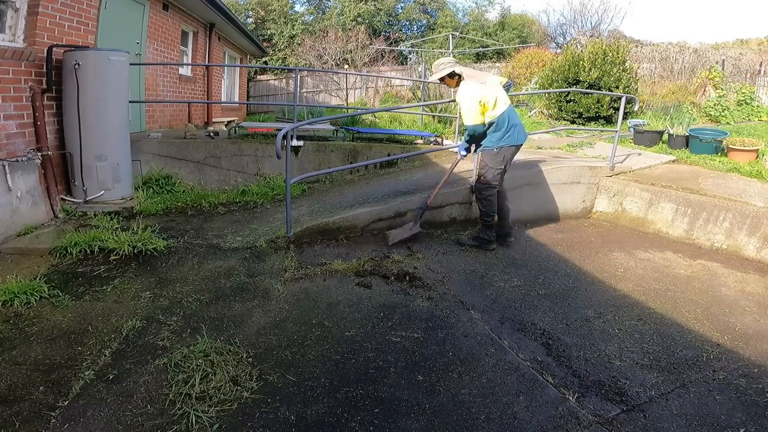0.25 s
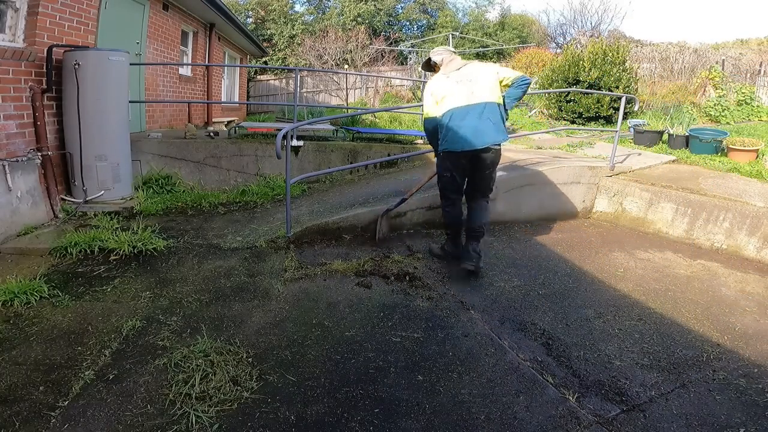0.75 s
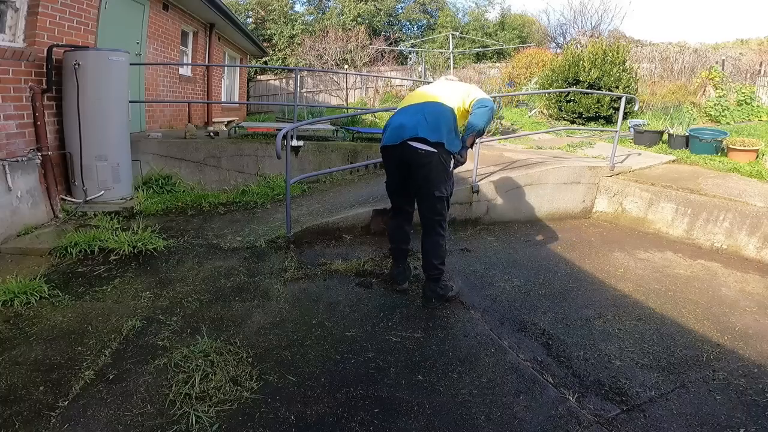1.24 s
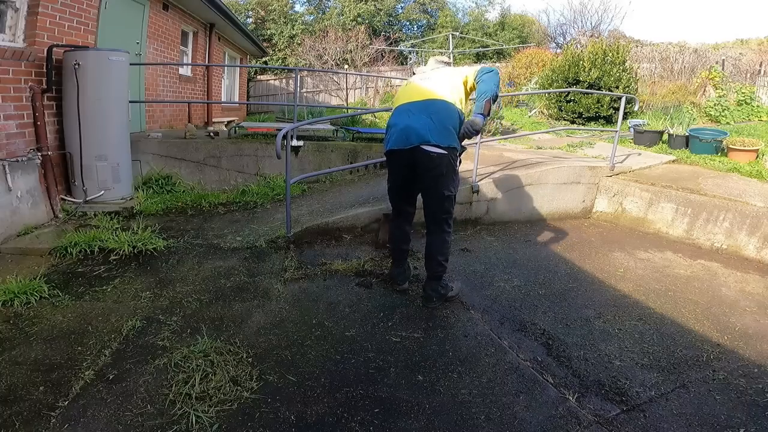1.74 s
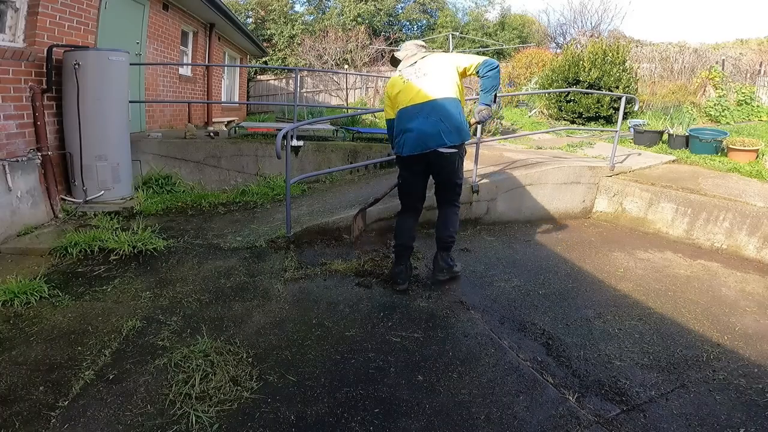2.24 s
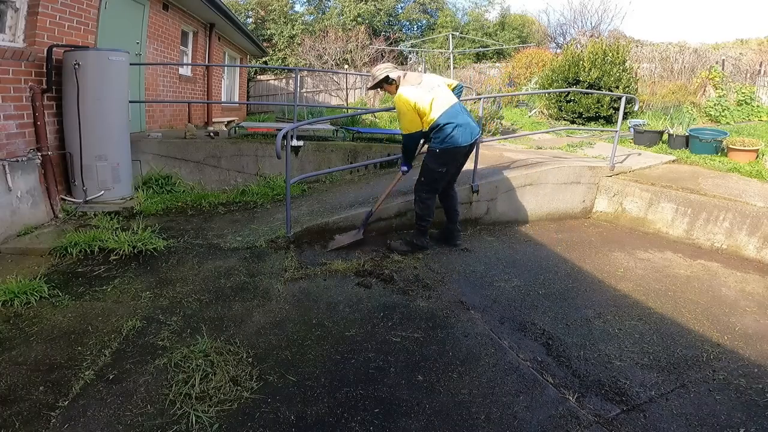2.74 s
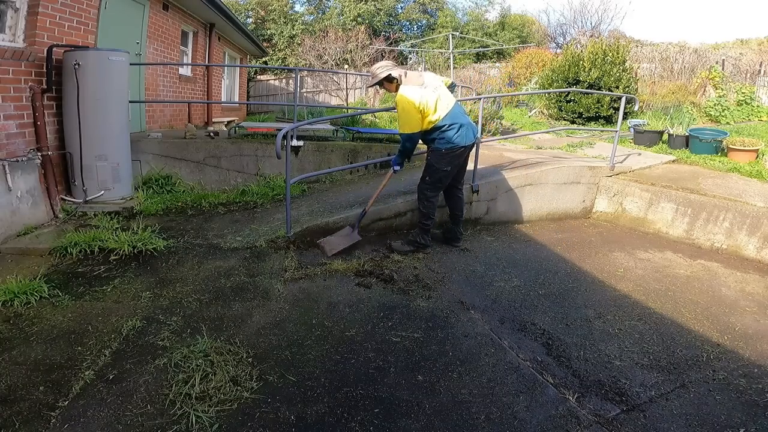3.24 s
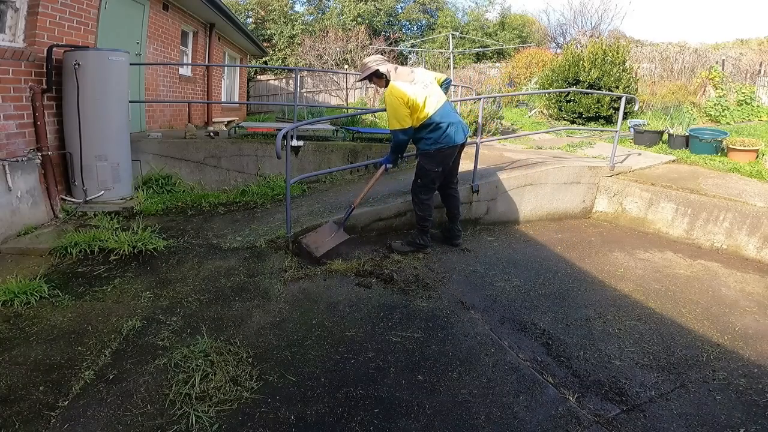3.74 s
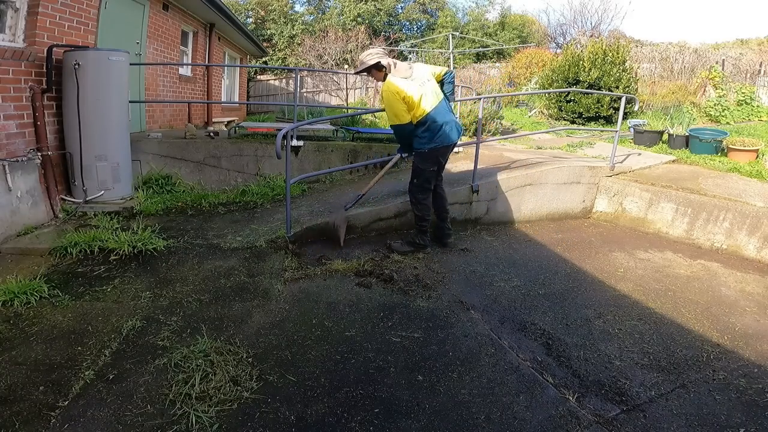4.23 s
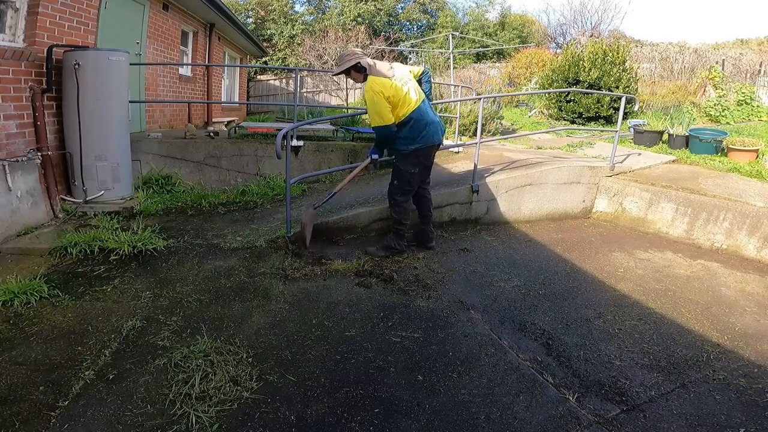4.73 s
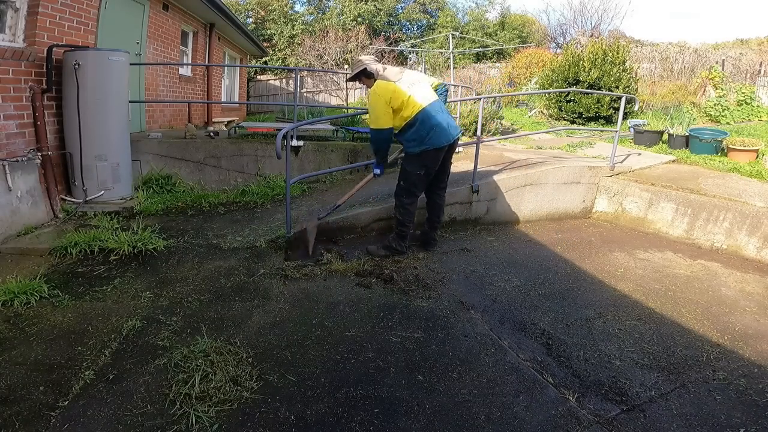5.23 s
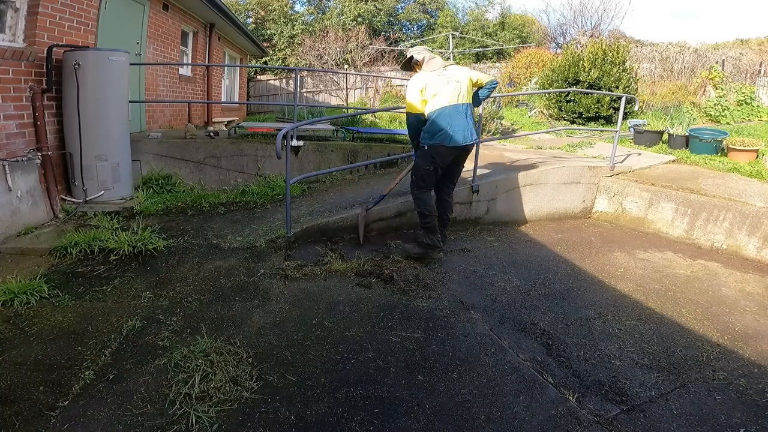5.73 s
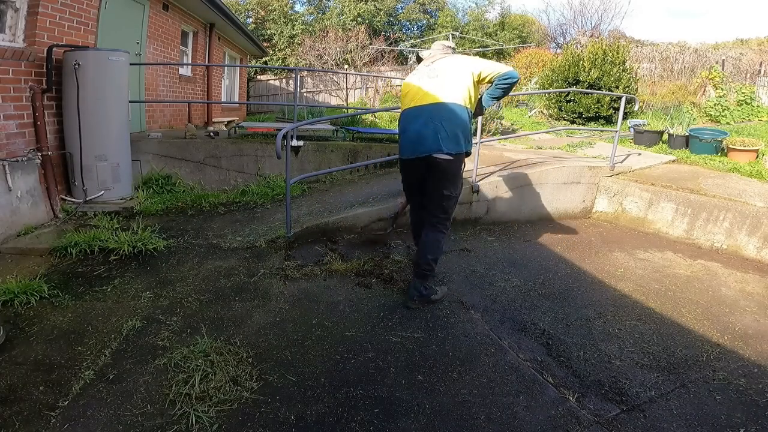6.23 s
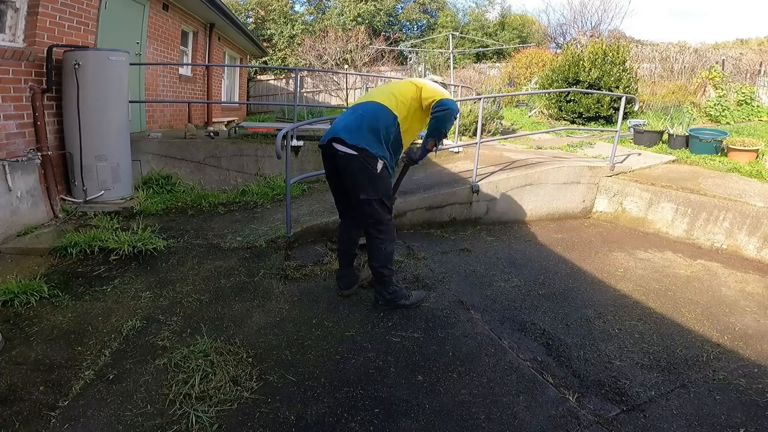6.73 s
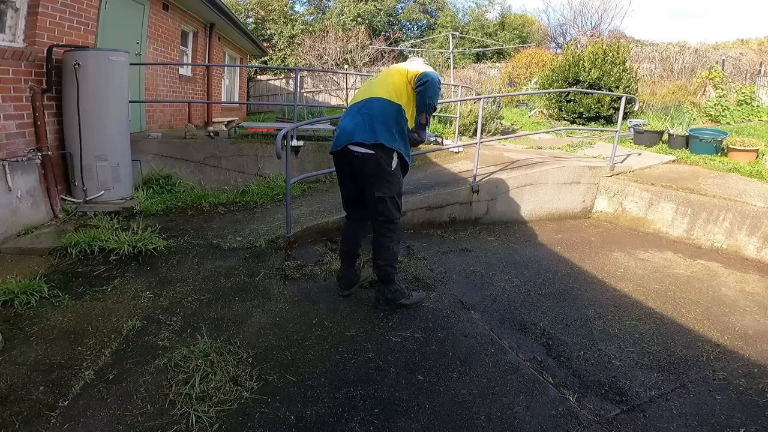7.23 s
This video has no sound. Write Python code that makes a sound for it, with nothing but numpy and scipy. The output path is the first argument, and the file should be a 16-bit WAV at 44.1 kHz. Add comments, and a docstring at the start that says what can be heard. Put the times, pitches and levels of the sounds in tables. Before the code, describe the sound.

In an open yard, a steel shovel is jabbed and pushed over mossy concrete a few metres from the microphone. Short gritty scrapes and crunchy knocks follow one another, some leaving a hollow glide or brief metallic ring, with dull damp thuds. Scraping turns brighter and denser mid-way, a distant engine drones later, wind rumble grows, strokes thin out and a faint bird whistles near the end.

```python
"""A light breeze moves from the start as a steel shovel is pushed and knocked, stroke after stroke, on mossy concrete.
Grit cracks under the edge and drives the blade's modes; wet moss deepens the sound and close surfaces scatter it.
Some contacts leave a hollow, gliding resonance or a singing steel tone; soft blows add low, ringless noise puffs.
Later a far engine drones in two fluttering orders, two faint scuffs pass and noise swells into a low wind rumble.
Near the end a bird whistles faintly: one buzzy sine that dips and rises."""
import sys
import numpy as np
from scipy import signal
from scipy.fft import rfft, irfft
from scipy.io import wavfile

SR = 44100
rng = np.random.default_rng(int(sys.argv[2]) if len(sys.argv) > 2 else 0)


def inscribe(sig):
    """Save sig as 16-bit PCM at rate SR to the path in sys.argv[1].

    A 1-D sig is mono; a 2-D sig holds one channel per row.
    Samples are clipped to [-1, 1] before scaling.
    """
    pcm = np.round(np.clip(np.atleast_2d(sig).T, -1, 1) * 32767)
    wavfile.write(sys.argv[1], SR, pcm.astype(np.int16))


N = 329427
TIME = np.arange(N) / SR
TAPS = 16384  # length in samples of the impulse responses

# Ringing modes of the steel blade.
# Each row: frequency in Hz, width in Hz, relative level over the broad rasp in dB.
BLADE = [(466, 14.7, -5), (759, 18, 0), (793, 10, 2.5), (995, 35, 6), (1245, 26, -0.5), (1408, 53, 2),
         (1587, 43, 8), (1795, 21, 2.5), (1951, 52, 9), (2113, 24, 3.5), (2226, 39, 8.5), (2400, 15, 4),
         (2640, 170, 1), (2860, 33, -1), (3144, 100, -2), (4100, 104, -3.5), (4620, 130, -1),
         (5170, 140, -9), (5190, 100, -6), (5620, 42, -20.5), (5820, 220, -3), (6480, 85, 2),
         (6880, 29, -3.5)]
# The far bird's whistle as a curve.
# Each row: time in seconds, centre pitch in Hz, relative level in dB.
BIRD = [(6.82, 5350, -77), (6.859, 4950, -61), (6.9, 4500, -57), (6.93, 4050, -57), (6.96, 4340, -61),
        (6.98, 4500, -72)]


def gain_of(db):
    """Decibels to amplitude."""
    return 10 ** (np.asarray(db) / 20)


def evened(x):
    """Scales each channel to rms 1."""
    return x / np.sqrt(np.mean(x ** 2, axis=-1, keepdims=True) + 1e-20)


def read(points, hz):
    """Reads a spectrum on a log-frequency axis."""
    f, value = np.transpose(points)
    return np.interp(np.log(hz + 1), np.log(f + 1), value)


def follow(rows, t):
    """The columns of a curve at times t."""
    s, *columns = np.transpose(rows)
    return [np.interp(t, s, column) for column in columns]


def add(mix, s, sound):
    """Mixes a stereo sound in at time s."""
    start = max(round(s * SR), 0)
    part = mix[:, start:][:, :sound.shape[1]]
    part += sound[:, :part.shape[1]]


def band(x, lo_hz, hi_hz, order=4):
    """Causal band-pass."""
    edges_hz = [lo_hz, min(hi_hz, SR / 2 - 100)]
    return signal.sosfilt(signal.butter(order, edges_hz, "band", fs=SR, output="sos"), x)


def wander(count, per_s):
    """A random curve through normal points of unit spread, per_s of them a second."""
    at = np.arange(count) * per_s / SR
    return np.interp(at, np.arange(count), rng.standard_normal(count))


def outdoors(low_db=4, gust_db=4):
    """Leaves and distant air, shaped from noise, swell slowly over a lumpy wind rumble."""
    # Colour of the open air. Each row: frequency in Hz, relative level in dB per Hz.
    air_colour = [(59, -11.5), (100, -11), (443, -22.5), (582, -16.5), (764, -32.5), (904, -21),
                  (1700, -26), (2130, -31), (2800, -32), (5040, -36.5), (15000, -61)]
    # Swell of the open air. Each row: time in seconds, level in dB before the flutter.
    breeze_swell = [(0, -64.5), (1.1, -63.5), (2.35, -72), (2.7, -59), (4.4, -53.5), (4.85, -54.5),
                    (5.6, -53), (6.8, -61), (7.2, -54.5)]
    # Swell of the low wind. Each row: time in seconds, relative level in dB.
    rumble_swell = [(0, -82.5), (2.4, -82.5), (3.9, -71), (4.4, -64), (6.9, -52), (7.4, -51)]

    hz = np.fft.rfftfreq(N, 1 / SR)
    noise_spectrum = rfft(rng.standard_normal((2, N)))
    air = evened(irfft(noise_spectrum * gain_of(read(air_colour, hz)), N))
    gusts = rng.standard_normal((2, N)) * gain_of(gust_db * wander(N, 8.2))
    rumble = evened(band(gusts, 24.2, 73.0, order=2))
    flutter_db = 1.8 * wander(N, 18)
    air_db = follow(breeze_swell, TIME)[0] + flutter_db
    rumble_db = follow(rumble_swell, TIME)[0] + low_db
    return air * gain_of(air_db) + rumble * gain_of(rumble_db)


def blade_response(contact_db=2.5, ripple_db=1.0):
    """Modes stand out of a broad rasp, differently for each point of contact; minimum phase lets them ring."""
    # Broad scrape colour of the steel. Each row: frequency in Hz, relative level in dB per Hz.
    rasp_colour = [(59, -9), (100, -8.5), (166, -7.5), (218, 2.5), (300, -2.5), (467, 3), (530, -1.5),
                   (774, 1), (1110, -8.5), (1550, -7), (1690, -6), (4660, -6.5), (7730, -11), (13700, -34),
                   (15500, -49)]

    hz = np.fft.rfftfreq(TAPS, 1 / SR)
    peaks = np.zeros(len(hz))
    for mode_hz, width_hz, db in BLADE:
        reach_db = contact_db * rng.standard_normal()  # how well this contact reaches the mode
        peaks += gain_of(db + reach_db) ** 2 / (1 + (2 * (hz - mode_hz) / width_hz) ** 2)
    # countless small upper modes
    crowded = np.interp(hz, np.linspace(0, SR / 2, 280), rng.standard_normal(280))
    crowded = crowded * np.minimum(hz / 4000, 1)
    rasp = gain_of(read(rasp_colour, hz) + ripple_db * crowded)
    log_gain = np.log(rasp * np.sqrt(.5 + peaks))
    # the Hilbert transform of the log gain around the full circle gives the minimum phase
    circle = np.concatenate([log_gain, log_gain[-2:0:-1]])
    return np.exp(np.conj(signal.hilbert(circle)))[:len(hz)]


def yard(early_s=0.0063, tail_db=-5, scatter_per_s=700):
    """Paths from one spot to left and right: direct, scatter from near surfaces, a short tail off the walls."""
    # How fast the walls let go of each pitch. Each row: frequency in Hz, time to fall 60 dB in seconds.
    tail_times = [(150, 0.2), (530, 0.14), (1400, 0.19), (3700, 0.14), (10000, 0.11)]

    t = np.arange(TAPS) / SR
    hits = rng.random((2, TAPS)) < scatter_per_s / SR
    early = rng.choice([-1, 1], (2, TAPS)) * hits * np.exp(-t / early_s)
    early[[0, 1], rng.integers(0, 60, 2)] += 1.2  # direct path
    diffuse = rng.standard_normal((2, TAPS)) * (1 - np.exp(-t / 0.002))
    hz, frame_s, frames = signal.stft(diffuse, SR, nperseg=256)
    decay = gain_of(-60 * frame_s / read(tail_times, hz)[:, None])
    tail = signal.istft(frames * decay, SR, nperseg=256)[1][:, :TAPS]
    return (evened(early) + gain_of(tail_db) * evened(tail)) / np.sqrt(TAPS)


def friction(count, grains_per_s, grain_db, smooth, judder_db):
    """Sand grains crack under the edge over a fine rub; the edge catches and slips."""
    sizes = gain_of(grain_db * np.minimum(rng.exponential(1, count), 4))
    signs = rng.choice([-1, 1], count)
    grains = evened(sizes * signs * (rng.random(count) < grains_per_s / SR))
    rub = smooth * rng.standard_normal(count)
    judder = gain_of(judder_db * wander(count, 215.5))
    return evened((grains + rub) * judder)


def ground_echo(x, share=0.34, delay_s=0.001609, drift=3):
    """The concrete mirrors the blade; the echo's delay drifts as it moves, so the colour sweeps."""
    at = np.arange(len(x))
    first_delay = delay_s * SR * rng.uniform(0.753, 1.282)  # in samples
    delay = first_delay * np.exp(drift * rng.uniform(-0.99, 1) * at / SR)
    echo = np.interp(at - delay, at, x, left=0)
    return (x + share * echo) / np.hypot(1, share)


def shovel(drive, force_db, load_db, grit_db, deep_db, deepening):
    """The drive sounds the blade; a load of moss adds body, and still more depth, while bare grit adds treble."""
    response = irfft(rfft(yard()) * blade_response())
    drive = ground_echo(drive)
    low_db = deep_db + deepening * load_db
    # Each row: lower edge in Hz, upper edge in Hz, level against the force in dB.
    registers = [(57.5, 183, low_db - 12.0), (163.5, 407, low_db), (466, 1435, load_db),
                 (1164, 3710, 0.0028), (3780, 38000, grit_db)]
    out = 0
    for lo_hz, hi_hz, db in registers:
        order = 2 if hi_hz < 200 else 4
        ring = evened(band(response, lo_hz, hi_hz, order)) / np.sqrt(TAPS)
        pressed = drive * gain_of(force_db + db)
        out = out + signal.fftconvolve(ring, pressed[None], axes=1)
    return out


def pushes(fade_s=0.0038, level_db=2, body_db=-1.0):
    """The edge is driven over the concrete, its force swelling and easing while moss piles up on the blade;
    two faint scuffs, perhaps footsteps, are made the same way."""
    # Each row: reference time in seconds, length in seconds, share of the length at which it bears hardest
    # (kept off the very ends), relative force in dB, relative load in dB (body against force),
    # grit in dB (treble against force). The rows at 5.588 and 6.254 are the scuffs.
    push_rows = [(0.0, 0.01, 0.067, -32, -6, -9.5), (0.081, .13, 0.78, -33.5, -8, -2.5),
                 (0.383, .11, 0.54, -35.5, -7, -4.5), (0.873, 0.083, 0.25, -53, 4, -2),
                 (1.422, 0.064, 0.84, -38, -5, -11), (1.457, 0.062, 0.4, -35.5, 0, -12),
                 (1.731, 0.093, 0.52, -47, 5.5, -7), (1.806, 0.041, 0.41, -35.5, -4.5, -8),
                 (2.128, 0.11, 0.4, -33.5, 0.5, -4.5), (2.767, 0.1, 0.37, -32.5, -11, 0.5),
                 (3.015, 0.084, 0.25, -34, -6.5, 2), (3.151, 0.054, 0.44, -34, -8.5, 0),
                 (3.208, 0.077, 0.41, -32, -5, 2), (3.402, 0.074, 0.32, -34.5, -11.5, -2),
                 (3.622, 0.095, 0.82, -36, -12, 0.5), (4.166, 0.13, 0.54, -31, -8, -2.5),
                 (4.587, 0.12, 0.54, -30, -12, -4), (4.947, 0.067, 0.15, -45, -8, -6),
                 (5.017, 0.059, .5, -48, 0.5, 1), (5.282, 0.11, 0.37, -33, -3, -2.5),
                 (5.588, .14, 1, -58, -2, -6.5), (5.939, 0.09, 0.22, -48.5, 0.5, 1.5),
                 (6.254, 0.13, 0.51, -64.5, -8, -6.5), (6.431, 0.085, .35, -38.5, -4, -4),
                 (6.538, 0.071, 0.91, -34.5, -2.5, 4), (6.607, 0.089, 0.11, -48, -11, 2.5),
                 (6.695, 0.079, 0.44, -44.5, -8, -3.5), (7.007, 0.048, 0.6, -33.5, -6.5, -4.5),
                 (7.15, .1, 0.23, -59.5, 3, -17), (7.266, 0.056, 0.92, -46, -2, -24),
                 (7.352, 0.067, 0.56, -47, 2, -9), (7.445, 0.063, 0.75, -31, -6, -2.5)]
    swell_db, ease_db = 13.5, 12  # rise up to the hardest point, fall after it
    pile_db = 2  # load gained from start to end

    out = np.zeros((2, N))
    t = np.arange(TAPS // 2) / SR
    for s, length_s, hardest, force_db, load_db, grit_db in push_rows:
        along = np.minimum(t / length_s, 1)
        hardest = np.clip(hardest, .05, .95)
        before_db = swell_db * (1 - along / hardest) ** 2
        after_db = ease_db * ((along - hardest) / (1 - hardest)) ** 2
        slack_db = np.where(along < hardest, before_db, after_db)
        moss_db = load_db + body_db + pile_db * (along - .5)
        press = np.clip(np.minimum(t, length_s - t) / fade_s, 0, 1)
        drive = press * friction(len(t), grains_per_s=2300, grain_db=5.0, smooth=0.91, judder_db=2.04)
        scrape = shovel(drive, force_db + level_db - slack_db, moss_db, grit_db, deep_db=-0.5, deepening=1.54)
        add(out, s - .004, scrape)
    return out


def knocks(rise_s=0.017, lead_s=.0152, level_db=-5, body_db=1.5):
    """The edge sinks through the moss and bites in a quick crunch that swells and dies."""
    # Each row: bite time in seconds, relative force in dB, relative load in dB (body against force),
    # grit in dB (treble against force), time constant of the dying contact in seconds.
    knock_rows = [(0.0747, -27.5, -3.5, -8.5, 0.0088), (0.367, -28, -2, -5, .02),
                  (0.5441, -30.5, -9.5, -9, 0.0084), (0.629, -31.5, 3.5, -8.5, 0.0091),
                  (0.706, -45.5, -7, -6, 0.034), (0.7508, -23, -9, -13.5, 0.0063),
                  (0.856, -29.5, -2, -12, 0.01), (0.9348, -36.5, 1, -9.5, 0.0053),
                  (0.9876, -39, -8.5, -21, 0.011), (1.2595, -19.5, -8.5, -5, 0.012),
                  (1.648, -23, -3, -5.5, 0.0088), (2.0477, -21.5, -2, -5.5, .01),
                  (2.4273, -62.5, 5.5, -4, 0.012), (2.4957, -63, -6, 5.5, 0.0031),
                  (2.693, -27, -5, -2, 0.024), (2.8835, -35.5, 1, 4, 0.0026), (2.9809, -33, -10, 1, 0.036),
                  (3.144, -31, -11, 5, 0.02), (3.3516, -28, -12.5, 0, 0.02), (3.4015, -30, -9, 6.5, 0.011),
                  (3.46, -29.5, -5, 2.5, .006), (3.5995, -28.5, -2.5, 3, 0.026),
                  (3.7114, -26, -1, -2, 0.003), (3.7932, -23, -6.5, -7, 0.004),
                  (3.9946, -28, -11, 4.5, .01), (4.144, -24.5, -1, -5.5, .008),
                  (4.4625, -45, 4, -7, 0.0033), (4.494, -49.5, -18, -15, 0.0083),
                  (4.5728, -22.5, -9.5, -3.5, 0.0086), (4.7194, -27.5, 0.5, -2, 0.0063),
                  (4.9184, -29, 5.5, 0, .012), (5.0745, -29.5, -7, 1, 0.0019),
                  (5.2476, -21.5, -2.5, -2, 0.01), (5.7346, -28.5, 1.5, -4.5, 0.024),
                  (5.836, -44, -12, 0, .008), (5.9, -43.5, -8, -4.5, .006), (6.3999, -23, -5, -10, .018),
                  (6.5994, -35, 4, 0, 0.0076), (6.8138, -48.5, 1, -2.5, .009),
                  (6.9038, -42, -11, -7, 0.0084), (6.9839, -28.5, 0, 3, 0.0075),
                  (7.3499, -30, -3, -10.5, .011)]

    out = np.zeros((2, N))
    t = np.arange(TAPS // 3) / SR
    for s, force_db, load_db, grit_db, contact_s in knock_rows:
        release = np.exp(-np.maximum(t - rise_s - .003, 0) / contact_s)
        press = np.minimum(t / rise_s, 1) ** 2 * release
        drive = press * friction(len(t), grains_per_s=4000, grain_db=3.5, smooth=0.97, judder_db=-1)
        crunch = shovel(drive, force_db + level_db, load_db + body_db, grit_db, deep_db=-4.0, deepening=1.83)
        add(out, s - lead_s, crunch)
    return out


def hollows(width_hz=210, level_db=3):
    """Scraping noise in the air resonance between blade and ground, gliding as the gap opens or shuts."""
    # Each row: reference time in seconds, length in seconds, first pitch in Hz, last pitch in Hz,
    # relative level in dB.
    hollow_rows = [(0.073, 0.071, 1402, 1538, -37.5), (0.077, .12, 483, 772, -39.5),
                   (1.267, 0.062, 861, 791, -33), (1.279, 0.049, 1133, 1067, -39.5),
                   (1.629, 0.079, 1750, 1038, -36), (1.657, 0.065, 890, 790, -34),
                   (2.052, 0.045, 943, 754, -37), (4.711, 0.035, 1116, 830, -35),
                   (6.602, 0.064, 926, 960, -44.5)]

    out = np.zeros((2, N))
    lowpass = signal.butter(2, width_hz / 2, fs=SR, output="sos")
    for s, length_s, first_hz, last_hz, db in hollow_rows:
        count = round(length_s * SR)
        noise = rng.standard_normal(TAPS) + 1j * rng.standard_normal(TAPS)
        fuzz = signal.sosfilt(lowpass, noise)[-count:]
        glide_hz = np.geomspace(first_hz, last_hz, count)
        tone = (fuzz * np.exp(2j * np.pi * np.cumsum(glide_hz) / SR)).real
        faded = tone * signal.windows.tukey(count, .8)
        heard = signal.fftconvolve(yard(), faded[None], axes=1)
        share = np.sqrt(count / heard.shape[1] / 2)  # keeps short glides from gaining level
        add(out, s - .004, gain_of(db + level_db) * evened(heard) * share)
    return out


def rings(rise_s=0.015, level_db=5):
    """A blow on the right spot sets one blade mode singing: it builds up during the contact and rings on."""
    # Each row: reference time in seconds, pitch in Hz (the nearest blade mode sounds), relative level in dB.
    ring_rows = [(.17, 797, -39.5), (.48, 797, -43.5), (.54, 797, -44.5), (0.754, 2680, -39),
                 (1.464, 464, -27), (1.838, 1795, -42), (2.045, 2122, -35), (2.047, 2232, -36),
                 (2.149, 464, -29.5), (2.199, 1426, -32.5), (3.151, 1960, -32), (3.794, 1426, -31.5),
                 (4.001, 1582, -38.5), (4.001, 1960, -36), (4.142, 1582, -30), (4.226, 1582, -30),
                 (4.224, 1960, -36), (4.576, 1247, -33), (4.935, 1960, -38), (5.25, 2122, -37),
                 (5.343, 1582, -32), (6.405, 2122, -36), (7.028, 1582, -32), (7.03, 797, -41),
                 (7.03, 1426, -35), (7.03, 1960, -38)]
    ring_t60_s, ring_width_hz = 0.13, 30  # 60 dB decay of a mode this wide; narrower ones ring longer

    out = np.zeros((2, N))
    t = np.arange(TAPS) / SR
    for s, near_hz, db in ring_rows:
        hz, width_hz, _ = min(BLADE, key=lambda mode: abs(mode[0] - near_hz))
        t60_s = ring_t60_s * np.sqrt(ring_width_hz / width_hz)
        turns = hz * t + rng.random() + np.array([[0], [1 / 4]])  # the right leads by a quarter turn
        decay_db = -60 * np.maximum(t - rise_s, 0) / t60_s
        swell = np.minimum(t / rise_s, 1) * gain_of(db + level_db + decay_db)
        add(out, s - .004, swell * np.sin(2 * np.pi * turns))
    return out


def thuds(spread=1.41, level_db=3):
    """Wet clods, boots and the flat of the blade land on the moss: a low noise puff and no ring."""
    # Each row: reference time in seconds, relative level in dB, centre pitch in Hz,
    # time from start to the top of the swell in seconds.
    thud_rows = [(0.374, -33, 440, .011), (0.628, -40.5, 208, 0.01), (0.754, -39.5, 264, 0.01),
                 (0.859, -36.5, 258, .012), (1.278, -37, 332, 0.0065), (1.277, -51, 105, 0.022),
                 (1.48, -34, 243, 0.0053), (1.66, -33.5, 338, 0.0079), (1.662, -48.5, 105, 0.015),
                 (2.052, -39.5, 240, 0.012), (3.045, -40, 324, 0.0093), (4.198, -37, 189, 0.017),
                 (4.245, -31, 222, 0.0084), (4.629, -43, 285, .03), (4.715, -37.5, 184, 0.012),
                 (5.186, -36, 159, 0.027), (5.265, -33.5, 156, 0.024), (5.336, -42.5, 217, 0.022),
                 (5.58, -56, 167, .05), (5.737, -36, 530, 0.01), (5.992, -45.5, 137, 0.027),
                 (6.487, -32, 208, 0.017), (6.591, -34.5, 346, 0.0049), (7.155, -67, 400, 0.022),
                 (7.281, -46, 189, .026), (7.38, -42, 160, 0.0074)]

    out = np.zeros((2, N))
    t = np.arange(TAPS // 2) / SR
    for s, db, hz, peak_s in thud_rows:
        swell = t / peak_s * np.exp(1 - t / peak_s)
        noise = rng.standard_normal((2, len(t)))
        puff = band(noise, hz / spread, hz * spread, order=2) * swell
        add(out, s - .008, gain_of(db + level_db) * evened(puff) * np.sqrt(np.mean(swell ** 2)))
    return out


def engine(blur=1.0, overtone_db=-12, level_db=3):
    """A far drone: two low orders that flutter on their way through the air."""
    # Each row: time in seconds, pitch of the lower order in Hz, relative level in dB.
    engine_curve = [(2.6, 110, -97), (2.95, 99.8, -56.5), (3.9, 90, -86), (4.25, 98, -70.5),
                    (4.92, 100, -48), (5.45, 88.9, -60.5), (5.85, 71.35, -48), (6.42, 66.5, -49),
                    (6.6, 65, -72)]

    hz, db = follow(engine_curve, TIME)
    turn = np.exp(2j * np.pi * np.cumsum(hz) / SR)
    flutter = np.array([wander(N, 35) + 1j * wander(N, 4.8) for side in range(2)])
    paths = np.array([[1], [1j]]) + blur * flutter
    overtone = gain_of(overtone_db) * paths[::-1] * turn ** 2  # sides swapped
    drone = (paths * turn + overtone).real
    return gain_of(db + level_db) * evened(drone)


def bird(waver=0.081):
    """One thin whistle that dips and rises, buzzy from a fast random waver of its pitch."""
    t = BIRD[0][0] + np.arange(TAPS // 2) / SR
    hz, db = follow(BIRD, t)
    wavering_hz = hz * (1 + waver * wander(len(t), 990))
    whistle = np.sin(2 * np.pi * np.cumsum(wavering_hz) / SR)
    call = whistle * gain_of(db) * signal.windows.tukey(len(t), .2)
    return signal.fftconvolve(yard(), call[None], axes=1)


def scene():
    """The shovel a touch to the left, with the garden around it."""
    steel = pushes() + knocks() + hollows() + rings()
    balance = gain_of([[.2], [-.2]])  # left, right
    mix = outdoors() + steel * balance + thuds() + engine()
    add(mix, BIRD[0][0], bird())
    return mix


def record(dry, edge_hz=15500):
    """A steep low-pass takes away the treble above the edge."""
    lowpass = signal.firwin(511, edge_hz, window=("kaiser", 9), fs=SR)
    return signal.oaconvolve(dry, lowpass[None], "same")


dry = scene()
out = record(dry)
inscribe(out)
```